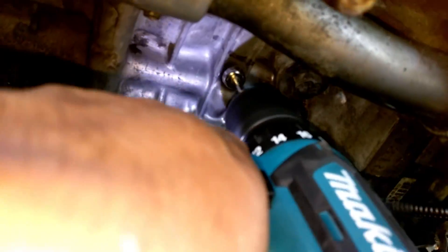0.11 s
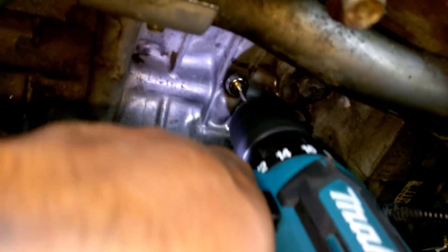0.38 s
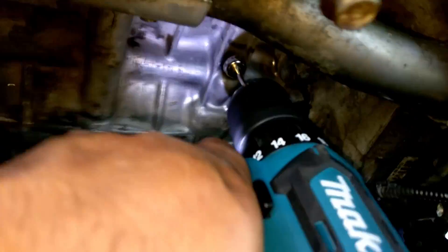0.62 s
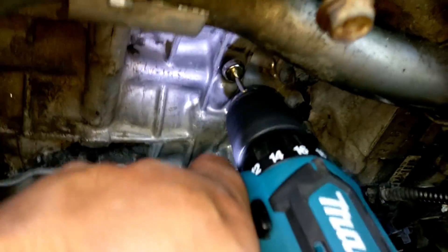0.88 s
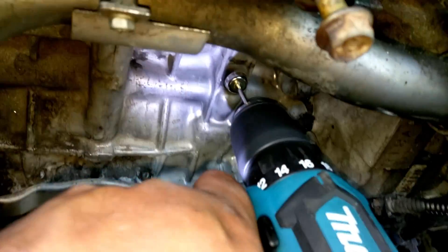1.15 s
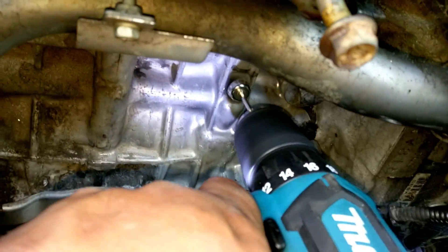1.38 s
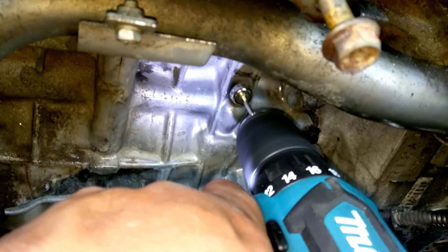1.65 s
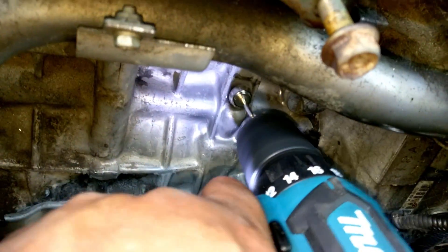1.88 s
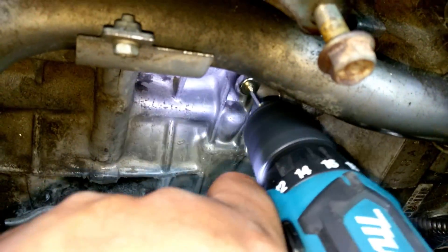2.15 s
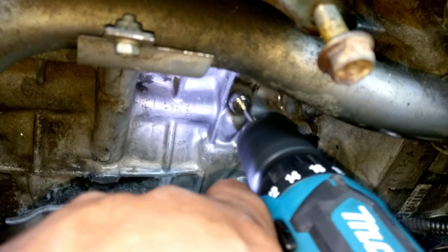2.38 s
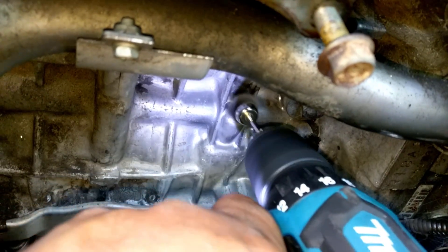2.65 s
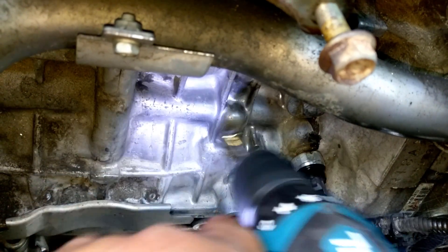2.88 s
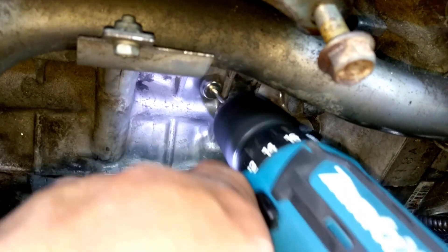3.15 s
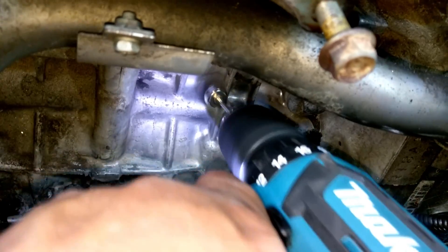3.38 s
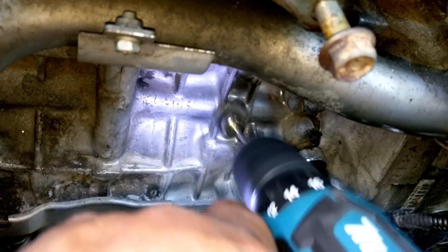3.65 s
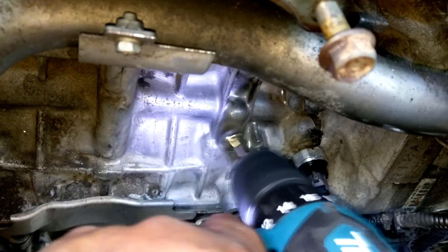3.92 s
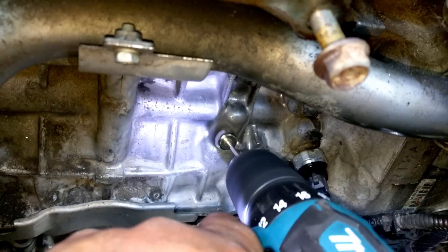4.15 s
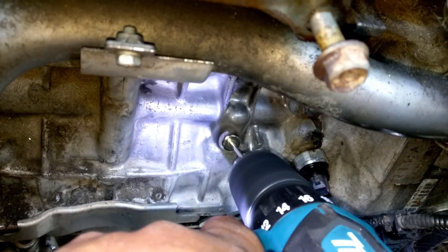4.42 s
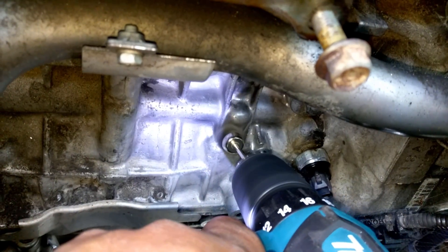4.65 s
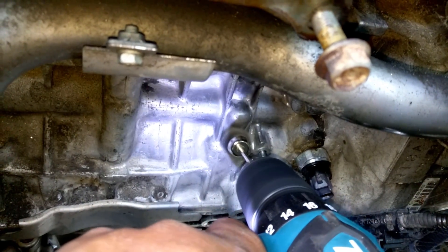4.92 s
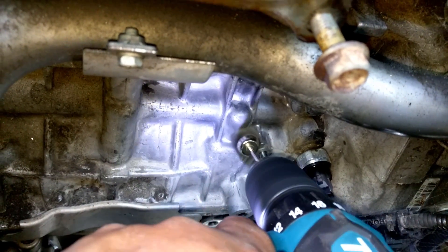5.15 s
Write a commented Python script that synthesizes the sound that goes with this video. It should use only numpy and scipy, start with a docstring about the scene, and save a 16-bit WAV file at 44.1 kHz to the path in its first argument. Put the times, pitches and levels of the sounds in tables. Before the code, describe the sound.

Close under a car body, a small stereo camera microphone hears a cordless drill scouring cast metal with a wire brush. From 0 to 1.2 s it runs at slow, almost steady speed: a buzzing, geared whine with grainy, slightly throbbing scrape, and a faint low hum coming and going in the first half second. At about 1.25 s the trigger is pulled and the pitch sweeps up about an octave within two tenths of a second, becoming loud, bright and harsh. It sags briefly around 1.8 s, recovers by 2 s and holds, then dips near 2.95 s; as it climbs again, three tiny dull knocks cluster just after 3 s as the brush snags. A longer, deeper sag follows from 3.3 to 3.6 s, then full whine and dense hissing scour continue steadily until the cut at 5.3 s. Soft low workshop rumble lies beneath, with short metallic reflections colouring the noise.

```python
"""Close under a car body, a cordless drill runs slowly, its wire brush scouring cast metal, over a brief low hum.
It then climbs to full trigger and sags three times; as it climbs out of the second sag the brush snags and knocks.
Rotor, slots, fan and planet gears are sines on multiples of the motor speed; bristles and cooling air are shaped
noise, and a workshop rumbles beneath.
A small camera with two microphone ports hears the bass in nearly opposite sign left and right."""
import sys
import numpy as np
from scipy import signal
from scipy.fft import rfft, irfft
from scipy.io import wavfile
from scipy.ndimage import uniform_filter1d

SR = 44100
rng = np.random.default_rng(int(sys.argv[2]) if len(sys.argv) > 2 else 0)


def voltage_ratio(level):
    """Linear amplitude factor for a level in decibels (scalar or array-like)."""
    return 10 ** (np.asarray(level, float) / 20)


def master(y):
    """Save y as 16-bit WAV."""
    cut = np.clip(np.atleast_2d(y).T, -1, 1)
    pcm = np.round(cut * 32767)  # scale
    wavfile.write(sys.argv[1], SR, pcm.astype(np.int16))


N = 233309
T = np.arange(N) / SR  # time in s
F = np.fft.rfftfreq(N, 1 / SR) + 1e-3  # Hz, kept above zero for the logarithm


def along(hz, value):
    """A value joined on a log-frequency axis."""
    return np.interp(np.log(F), np.log(hz), value)


def curves(table):
    """Columns of a table joined in time."""
    s, *columns = np.transpose(table)
    return [np.interp(T, s, c) for c in columns]


def walk(rate_hz):
    """Slow chance of spread 1: random steps at rate_hz, smoothed over one step."""
    k = int(SR / rate_hz)
    steps = np.repeat(rng.standard_normal(N // k + 2), k)
    steps = uniform_filter1d(steps, k)[:N]
    return steps / steps.std()


def pair(grain):
    """Left and right spectra of a noise with envelope grain, partly common to the two microphone ports."""
    # share common to both ports: hz, likeness (0-1), left_leads_rad
    ports = [(150, .97, -3.1), (400, .9, -2.9), (700, .75, -2.8), (1250, .88, -2.85), (1750, .78, -2.4),
             (2300, .4, -2), (3800, .45, -1.7), (5000, .3, -1.7)]
    hz, like, lead = np.transpose(ports)
    like = np.clip(along(hz, like), 0, .995)
    left, other = rfft(grain * rng.standard_normal((2, N)))
    common = like * left * np.exp(-1j * along(hz, lead))
    return np.array([left, common + np.sqrt(1 - like ** 2) * other])


def rotor():
    """Speed chases the trigger: torque builds with a lag, is capped, and coasting is slower than pulling."""
    # speed the rotor heads for under trigger and load: start_s, turns_per_s, creep_turns_per_s2
    trigger = [(0, 181.2, -2.3), (1.23, 377.8, 29), (1.47, 388.3, 0.1), (1.72, 321.2, -270),
               (1.887, 387, 9.6), (2.566, 395, -7.8), (2.925, 339, -14), (3.002, 384.7, 29.5),
               (3.304, 308.8, 23.4), (3.626, 387.4, 26.7), (3.91, 392, 1.65)]
    start_hz, most_pull = 171, 1300  # turns per s, turns per s per s
    rise_s, coast_s, torque_lag_s = .056, .127, .023
    step_s = .001
    clock = np.arange(0, T[-1] + .002, step_s)
    s, hz, creep = np.transpose(trigger)
    row = np.searchsorted(s, clock, "right") - 1
    speed, pull, out = start_hz, 0, []
    for asked in hz[row] + creep[row] * (clock - s[row]):
        gap = asked - speed
        wanted = min(gap / (rise_s if gap > 0 else coast_s), most_pull)
        pull += (wanted - pull) * step_s / torque_lag_s
        speed += pull * step_s
        out.append(speed)
    return np.interp(T, clock, out)


def grips():
    """Share of each of the five hand grips over time; one fades into the next."""
    # the hand shifts the drill: start_s, settle_s
    shifts = [(2.15, .33), (3.02, .05), (3.6, .2), (4.5, .4)]
    moved = [np.clip((T - s) / settle, 0, 1) for s, settle in shifts]
    return -np.diff([np.ones(N)] + moved + [np.zeros(N)], axis=0)


def tilt_swell(fast, grip):
    """Level in dB by order for lines that change with the tilt of the drill, most at speed."""
    # tilt of the drill: order, then db in each of the five grips at full speed
    tilts = [(1, -.5, .3, .5, 0, 0), (2, -1, 1, 0, -1, 0), (5, -2, 1, -5, -1, 1), (10, 3.5, 0, -.5, 1, 0),
             (12, 4.5, 1, 6, .5, -1), (15, 0, 0, -1, 1, 0), (20, -2, 1, 0, -1, 0), (24, -9, 0, -5, 2, 2.5),
             (30, -4, -2, -3, 4, 1), (33, -6, -1, -10, 2, -1), (34, -6, -1, -10, 2, -1),
             (35, -6, -1, -10, 2, -1), (36, -6, -1, -10, 2, -1), (40, -8, -8, -10, 3, -3)]
    wake_s, wake_db = .08, -4  # these lines come up as the motor first catches
    rise_db = wake_db * np.clip(1 - T / wake_s, 0, 1)
    return {order: rise_db + fast * (np.array(db) @ grip) for order, *db in tilts}


def port_leads(grip):
    """Lead of the left port by order, for lines whose paths to the two ports differ with the grip."""
    # paths to the ports: order, then left_leads_rad in each of the five grips
    paths = [(12, -8.2, -4, -1.3, -4.6, -5.5), (15, 5.5, 1.8, -.6, 1.4, 1.3), (20, 1.7, 1.7, .4, 1.6, 1.5),
             (24, .6, -2.7, -2.6, -2.8, -5.3)]
    return {order: np.array(lead) @ grip for order, *lead in paths}


def whirl(turns):
    """A faint tone just under the motor speed, weaker and opposite in sign on the right."""
    # left level: start_s, rms_db
    faint = [(1.3, -80), (1.4, -55), (1.7, -55), (1.8, -70), (2, -62), (2.1, -80)]
    tone = np.sqrt(2) * voltage_ratio(curves(faint)[0]) * np.sin(2 * np.pi * .845 * turns)
    return tone * np.array([[1], [-.8]])


def motor(turns, fast, sag, swell_db, leads):
    """One slightly wavering sine per multiple of the motor speed; the pattern changes as the speed climbs."""
    # lines before swell and effort: order (multiple of motor speed), slow_left_db, slow_right_db,
    # fast_left_db, fast_right_db, left_leads_rad (where the grip sets none)
    orders = [(1.0, -70.0, -70.0, -40.0, -42.0, -2.7), (2.0, -70.0, -70.0, -55.0, -49.0, -1.1),
              (3.0, -63.0, -59.0, -58.0, -44.0, 3.1), (5.0, -41.0, -43.0, -48.0, -34.0, -2.0),
              (6.0, -50.0, -69.0, -55.0, -36.0, 2.2), (7.0, -50.0, -53.0, -36.0, -39.0, -2.8),
              (9.333, -34.0, -34.0, -52.0, -46.0, -1.9), (10.0, -47.0, -54.0, -33.0, -24.0, -1.8),
              (11.0, -51.0, -56.0, -40.0, -35.0, 0.2), (12.0, -36.0, -50.0, -24.0, -29.0, 1.8),
              (13.0, -61.0, -49.0, -36.0, -39.0, -1.3), (14.0, -61.0, -58.0, -35.0, -37.0, -1.5),
              (15.0, -53.0, -55.0, -34.0, -35.0, 1.4), (17.43, -39.0, -37.0, -70.0, -70.0, -1.0),
              (18.0, -57.0, -51.0, -36.0, -50.0, 1.2), (18.667, -42.0, -43.0, -53.0, -54.0, 2.6),
              (19.0, -57.0, -56.0, -33.0, -42.0, -2.7), (20.0, -52.0, -51.0, -29.0, -34.0, 1.6),
              (22.0, -59.0, -52.0, -38.0, -47.0, -1.3), (23.0, -53.0, -37.0, -44.0, -58.0, -1.5),
              (24.0, -42.0, -41.0, -29.0, -34.0, -2.7), (25.0, -48.0, -43.0, -37.0, -48.0, 2.6),
              (26.0, -58.0, -50.0, -44.0, -49.0, -1.0), (28.0, -58.0, -47.0, -45.0, -44.0, 3.1),
              (30.0, -39.0, -44.0, -41.0, -35.0, -1.6), (32.0, -46.0, -51.0, -55.0, -50.0, 2.4),
              (33.0, -57.0, -57.0, -54.0, -46.0, 2.1), (34.0, -61.0, -56.0, -49.0, -44.0, 1.9),
              (35.0, -51.0, -63.0, -49.0, -47.0, 3.0), (36.0, -54.0, -66.0, -49.0, -42.0, -1.6),
              (40.0, -52.0, -57.0, -57.0, -44.0, -0.9), (41.0, -49.0, -56.0, -70.0, -70.0, -2.9),
              (47.0, -52.0, -57.0, -70.0, -70.0, -1.1), (52.0, -48.0, -51.0, -70.0, -70.0, 2.7),
              (55.0, -49.0, -51.0, -70.0, -70.0, -1.8)]
    # lines that change with the work of the motor: order, sag_db, halfway_up_db, full_torque_db
    effort = [(1, -4, -4, 1), (2, -7, 0, 1), (5, 3, -9, 0), (9.333, 12, -5, 4), (10, -8, 0, 2),
              (12, -7.5, 7, 5), (15, 8.5, -4, -3), (18.667, 0, 3, 4), (20, -8, 0, 1), (24, -3, 0, 0),
              (30, -2, 0, 0), (33, -4, 0, 0), (34, -4, 0, 0), (35, -4, 0, 0), (36, -4, 0, 0),
              (40, -4, 0, 0)]
    torque_db, full_torque = 1.5, 1000  # gain of the other lines while speed climbs; turns per s per s
    effort_db = {order: law for order, *law in effort}
    climb = np.gradient(np.gradient(turns)) * SR ** 2
    climb = uniform_filter1d(climb, size=2000)
    work = np.array([sag, 4 * fast * (1 - fast), np.clip(climb / full_torque, 0, 1)])
    shake = .003 * walk(40)  # turns of play in bearings and gears
    out = np.zeros((2, N))
    for order, slow_l, slow_r, fast_l, fast_r, lead in orders:
        blend = fast ** 4 if order % 1 else fast  # the planet mesh keeps singing through the run-up
        db = np.outer([slow_l, slow_r], 1 - blend) + np.outer([fast_l, fast_r], blend)
        db += np.array(effort_db.get(order, [0, 0, torque_db])) @ work
        db += swell_db.get(order, 0)
        waver_db = 1.5 if order in swell_db else 3.0
        db += waver_db * np.array([walk(15), walk(15)])
        angle = 2 * np.pi * (order * (turns + shake) + rng.random())
        out += np.sqrt(2) * voltage_ratio(db) * np.sin([angle + leads.get(order, lead), angle])
    return out + whirl(turns)


def throb(turns, fast):
    """Beat of the scrape in dB, with each turn of the brush and with multiples of the rotor speed."""
    gearing = 15.5  # motor turns per brush turn
    db = (.9 - .7 * fast) * np.sin(2 * np.pi * turns / gearing) + .4 * walk(9)
    for order, depth_db in ((4, 0.69), (2, .6), (6, .5)):
        db += depth_db * np.sin(2 * np.pi * order * turns)
    return db


def echoes():
    """Fine ripple that short reflections from close metal lay on the colour at each port."""
    echo_db, decay_s = -12, .02
    tail = rng.standard_normal((2, N)) * np.exp(-T / decay_s)
    tail /= np.linalg.norm(tail, axis=1, keepdims=True)
    return np.abs(1 + voltage_ratio(echo_db) * rfft(tail))


def hollows():
    """Gain in dB at each port from bell-shaped peaks and dips: the hollows of the bodywork."""
    # as each port hears them: hz, width_hz, left_db, right_db
    bells = [(583, 670, -3.5, -4), (1000, 48, -1, 0.5), (1160, 1300, 3, 0), (1950, 74, -1, 0.5),
             (2176, 130, -8.5, -4.5), (2680, 1300, 1.5, -0.5), (3183, 260, -6.5, 3.5), (3390, 310, 7, 2),
             (3850, 170, -8.5, 1), (4250, 250, 0.5, -1), (5360, 160, -9, 4), (5630, 320, 4, 0),
             (6000, 160, -4.5, -3.5), (8190, 110, -10, -7), (8640, 220, -3, -3), (9840, 270, 0.5, 2.5)]
    db = 0
    for at, width, left, right in bells:
        db = db + np.outer([left, right], np.exp(-.5 * ((F - at) / (width / 2)) ** 2))
    return db


def scrape(turns, fast, level_db, treble_db):
    """Dense bristle, gear and air noise that throbs and changes colour with speed."""
    # relative colour of scrape and air: hz, slow_left_db, slow_right_db, fast_left_db, fast_right_db
    colour = [(267, -27.5, -29.5, -23.5, -27.5), (510, -25, -24.5, -19, -15), (867, -20, -20, -16.5, -15),
              (1207, -15.5, -16.5, -6.5, -9), (1600, -8, -8.5, -8.5, -3.0), (2060, -9.5, -7, -2, 1.5),
              (3180, -13.5, -8, -6, -1.5), (3710, -12, -12.5, -8.5, 3.5), (5120, -11, -11.5, -3, -5),
              (6040, -13, -16, -3, -2), (7000, -15, -22, -5.5, -10.5), (8450, -11.5, -17.5, -6, -10.5),
              (10500, -21.5, -28, -12, -17.5), (12800, -29.5, -27.5, -20.5, -18.5),
              (16000, -38, -28, -33, -19)]
    treble_hz = 6500
    noise = pair(voltage_ratio(throb(turns, fast))) * echoes()
    hz, *colours = np.transpose(colour)
    hollow_db = hollows()
    body = (F > 1200) & (F < treble_hz)  # the band that sets the level
    high = np.clip((F - treble_hz) / 1000 + .5, 0, 1)
    out = 0
    for share, ports in ((1 - fast, colours[:2]), (fast, colours[2:])):
        gain = voltage_ratio(np.array([along(hz, c) for c in ports]) + hollow_db)
        gain *= np.clip(F / hz[0], 0, 1) ** 2
        gain /= np.sqrt(body.mean() * np.mean(gain[:, body] ** 2, axis=1, keepdims=True))
        low_part = irfft(noise * gain * (1 - high), N)
        high_part = irfft(noise * gain * high, N)
        out = out + share * (low_part + voltage_ratio(treble_db) * high_part)
    return out * voltage_ratio(level_db)


def jolts():
    """The brush snags and jolts the drill: short dull noise knocks, opposite in sign on the right."""
    # knocks on the left: start_s, peak_db, top_hz
    snags = [(3.012, -25, 1000), (3.028, -22, 1300), (3.045, -26, 900)]
    out = np.zeros(N)
    for s, db, hz in snags:
        burst = rng.standard_normal(N) * np.exp(-np.clip(T - s, 0, None) / 0.011) * (T > s)
        band = signal.butter(1, [60, hz], "bandpass", fs=SR, output="sos")
        knock = signal.sosfilt(band, burst)
        out += voltage_ratio(db) * knock / np.abs(knock).max()
    return out * np.array([[1], [-.7]])


def shop(grip):
    """Low workshop rumble of filtered noise, swelling with the grip, and a hum sine that comes and goes."""
    # relative colour of the rumble: hz, db (per Hz)
    colour = [(25, -16), (45, 4.5), (80, -1), (130, 5.5), (200, -12), (400, -3), (800, -8)]
    # low hum: start_s, pitch_hz, rms_db
    hum_path = [(0, 125, -42), (.15, 125, -55), (.26, 125, -64), (.33, 125, -46), (.42, 125, -47.5),
                (.6, 125, -79), (1.2, 125.1, -78)]
    # the rumble swells and sinks: swell_db in each of the five grips
    swells = [-0.5, 1.5, 6, 3, -1]
    rumble_db = -48 + np.array(swells) @ grip
    hz, db = np.transpose(colour)
    shape = voltage_ratio(along(hz, db)) * np.clip(hz[-1] / F, 0, 1) ** 2
    rumble = irfft(pair(voltage_ratio(2 * walk(5.9))) * shape, N)
    hum_hz, hum_db = curves(hum_path)
    hum = np.sqrt(2) * voltage_ratio(hum_db) * np.sin(2 * np.pi * np.cumsum(hum_hz) / SR)
    return rumble / rumble.std() * voltage_ratio(rumble_db) + hum * np.array([[1], [-1]])


def scene():
    """Rotor speed drives both the lines and the scrape; snag knocks and the workshop join them."""
    # pressure and place of the brush: start_s, scrape_db (at full speed), left_minus_right_db,
    # treble_db (before sag)
    press = [(0, -16, 0, -1.5), (.3, -16, -0.3, -1.5), (.65, -15.2, -3.5, -1.1), (1.2, -16, -4.5, -0.5),
             (1.4, -15.5, -6, 0), (1.75, -16, -3.5, -.5), (1.88, -15, -5, 0.5), (1.97, -15, -5, -0.5),
             (2.3, -15.5, -3.5, 0.5), (2.7, -16.5, -4, 1.2), (2.92, -16.5, -4, 1.5), (3.03, -14.8, -4, 1.5),
             (3.12, -16, -2.5, -0.2), (3.3, -16.5, -4, 1.5), (3.55, -17.5, -4.5, 0.5),
             (3.8, -16.5, -4, 1.5), (4.2, -16.5, -4, 0.3), (4.7, -17, -4, 0.2), (5.29, -17.1, -4.4, -0.5)]
    slow_hz, fast_hz = 180, 310  # turns per s between which the sound goes from slow to fast
    full_hz, sag_hz = 390, 38  # full speed, and the drop below it that counts as one sag
    speed, grip = rotor(), grips()
    turns = np.cumsum(speed) / SR
    fast = np.clip((speed - slow_hz) / (fast_hz - slow_hz), 0, 1)
    sag = fast * np.clip((full_hz - speed) / sag_hz, 0, 1)
    press_db, pan_db, treble_db = curves(press)
    level_db = press_db + 8 * np.log2(speed / full_hz)  # 8 dB per octave of speed
    level_db = level_db + np.array([pan_db, -pan_db]) / 2
    treble_db = treble_db - 2 * sag
    drill = motor(turns, fast, sag, tilt_swell(fast, grip), port_leads(grip))
    brush = scrape(turns, fast, level_db, treble_db)
    return drill + brush + jolts() + shop(grip)


def band_limit(x):
    """A steep low-pass at the top of the band."""
    return signal.sosfilt(signal.butter(12, 16320, fs=SR, output="sos"), x)


def record(dry):
    """The camera cuts the top steeply above 15740 Hz."""
    top_cut = signal.ellip(10, .2, 70, 15740, fs=SR, output="sos")
    mix = signal.sosfilt(top_cut, dry)
    return band_limit(mix)


dry = scene()
out = record(dry)
master(out)
```